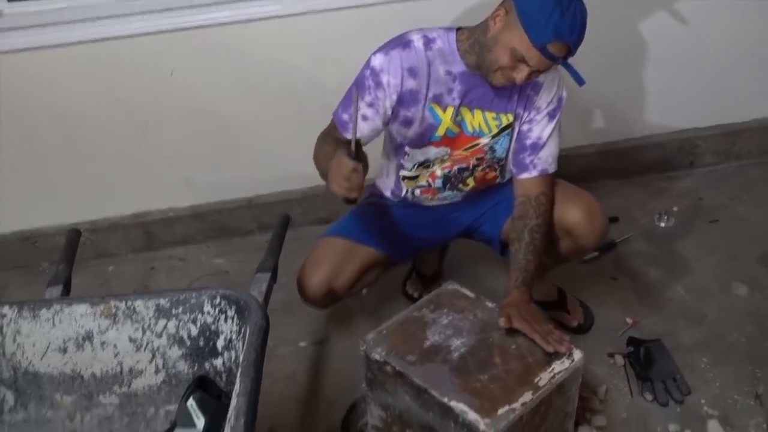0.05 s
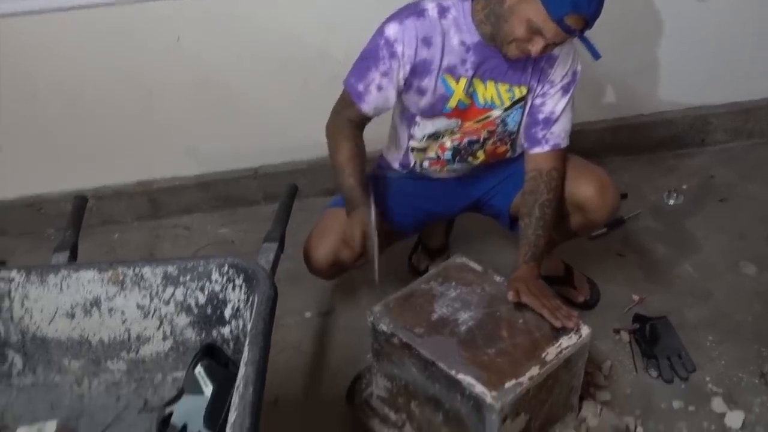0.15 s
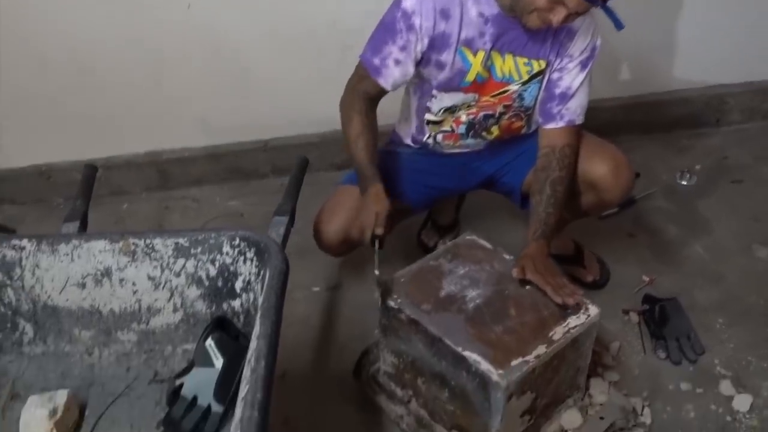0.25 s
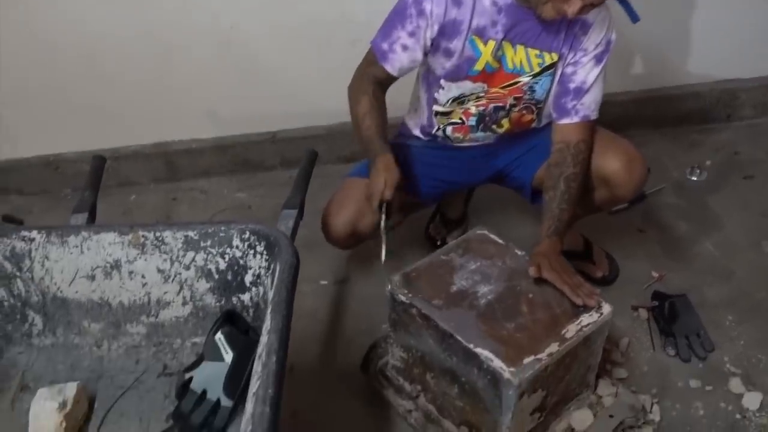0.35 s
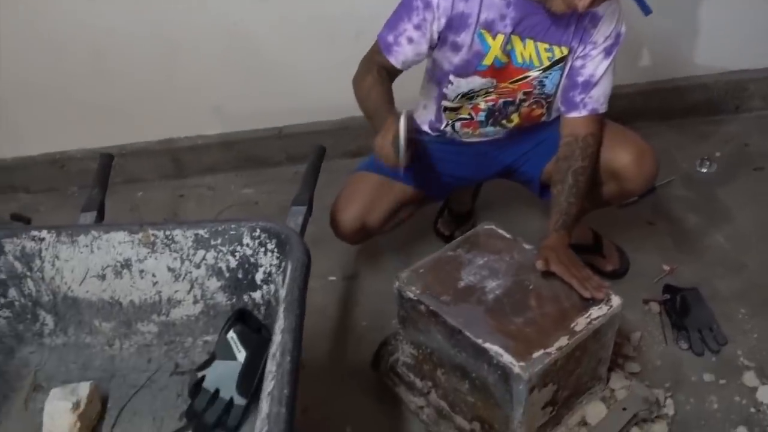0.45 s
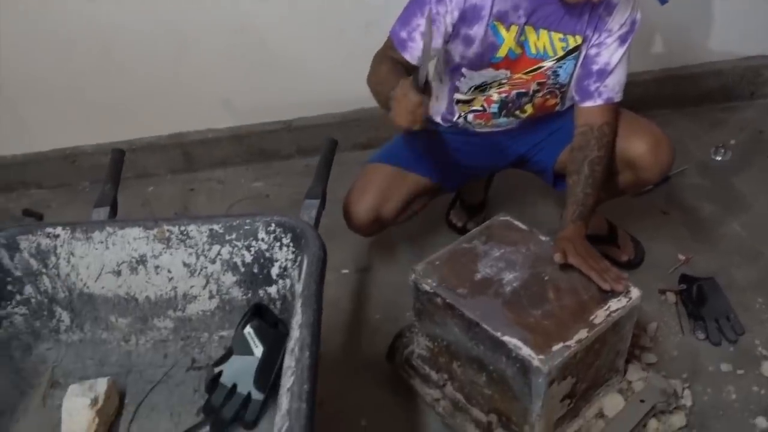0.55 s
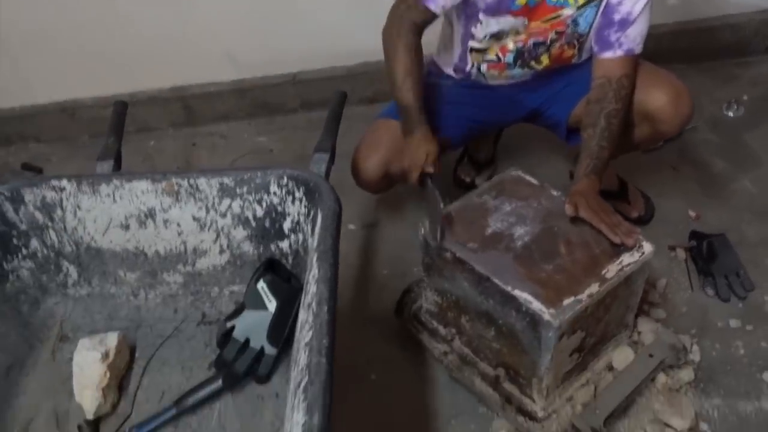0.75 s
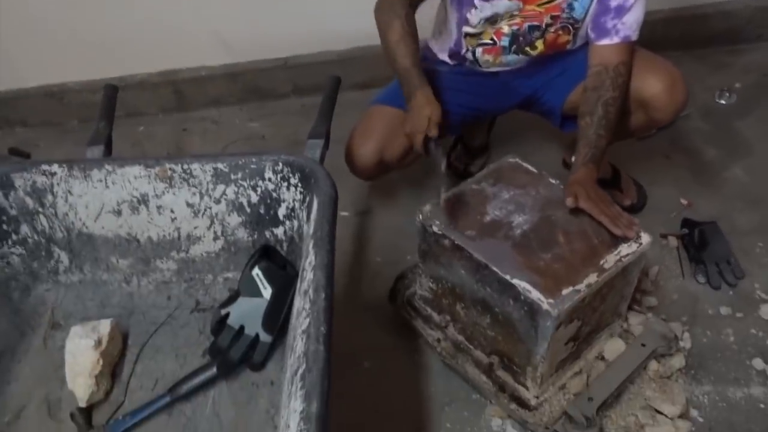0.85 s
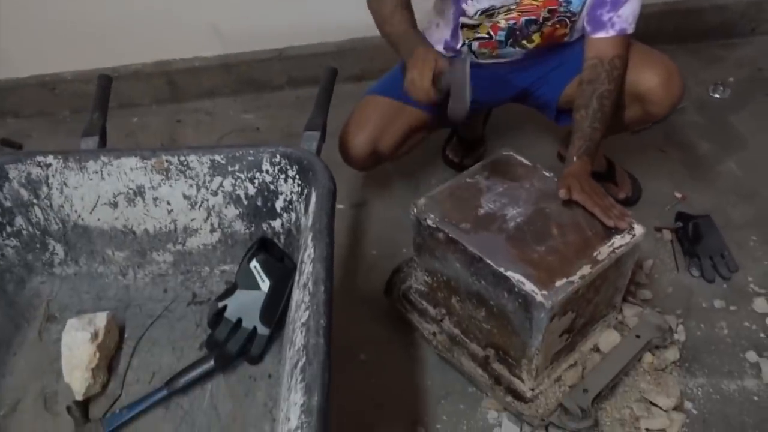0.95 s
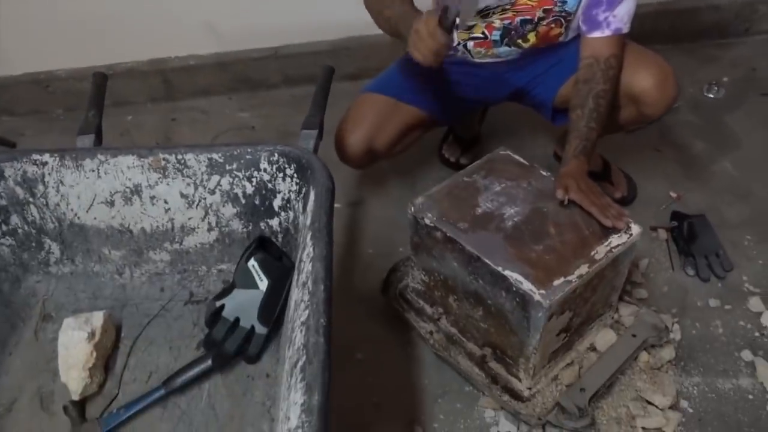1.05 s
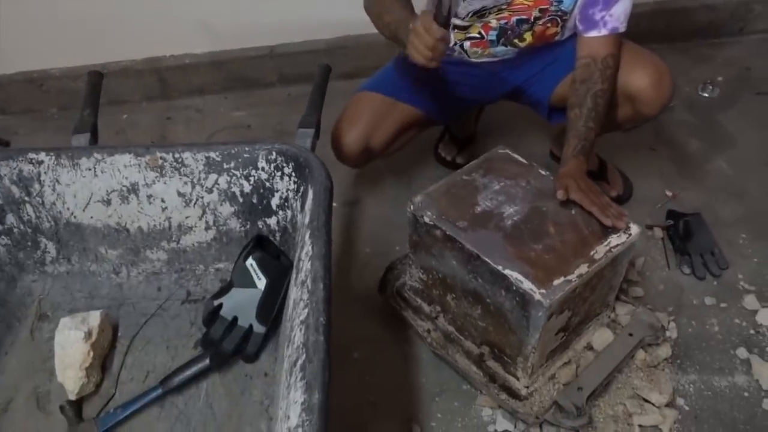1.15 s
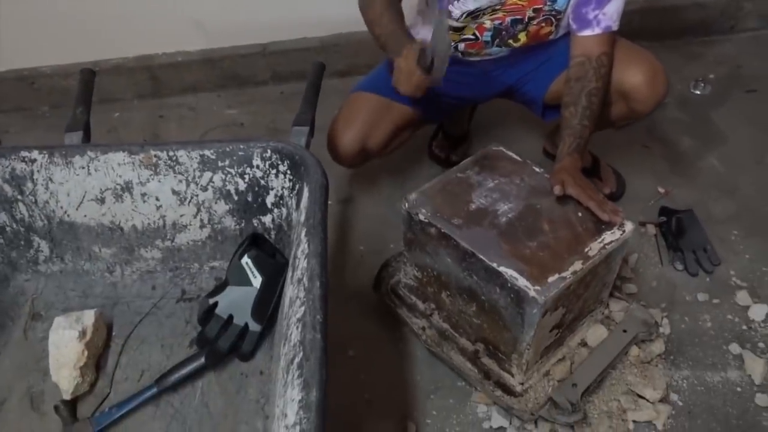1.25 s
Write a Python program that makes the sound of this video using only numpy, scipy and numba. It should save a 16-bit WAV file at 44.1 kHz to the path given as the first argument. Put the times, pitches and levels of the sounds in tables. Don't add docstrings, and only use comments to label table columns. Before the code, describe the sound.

Hammer striking a chisel on a steel safe, two hard cracks ringing in a bare garage

```python
import sys
import numpy as np
from scipy import signal
from scipy.fft import rfft, irfft
from scipy.io import wavfile
from numba import njit

SR = 44100
rng = np.random.default_rng(int(sys.argv[2]) if len(sys.argv) > 2 else 0)


def waveform_to_disk(signal):
    frames = np.transpose(np.atleast_2d(signal))
    scaled = np.clip(frames, -1, 1) * 32767
    samples = np.round(scaled).astype(np.int16)
    wavfile.write(sys.argv[1], SR, samples)


def makeup_ratio(level_db):
    decades = np.asarray(level_db, float) / 20
    return 10 ** decades


N = 57330

STRIKE_TIMES = .2243, .7500
# (level [dB], brightness [dB/octave])
STRIKE_FORCE = [
    (-1.3, -0.17),
    (-1.52, 0.59),
]
# (time [s], level [dB], brightness [dB/octave])
OTHER_BLOWS = [
    (-.30, 1.5, -0.5),
    (0.256, -30.5, 6.5),
    (0.31, -18, -1),
    (0.848, -18.5, 0),
]
# (frequency [Hz], level [dB], t60 [s])
PLATE_MODES = [(83.7, -6, 0.25), (173, -3.5, 0.048), (225.7, 4.5, 0.05), (429.6, 0.5, 0.13),
               (550, -2.5, 0.14), (890, -53, 0.1), (1174, -12, .06), (1320, -15, 0.037), (1890, -16, .05),
               (3290, -14, 0.056), (4140, 0, 0.03)]
# (level [dB], frequency [Hz], t60 [s])
STRAIGHT_MODES = [
    [(-6.5, 184, 0.34), (-19.5, 238, 0.11), (-12.5, 410, 0.44), (-13, 1460, 0.013), (-22, 2900, 0.0094)],
    [(-11.5, 222, 0.36), (-10.5, 178, 0.2), (-9, 2800, 0.025), (-21, 4900, 0.03), (-20.5, 7050, 0.0066)],
]
# (frequency [Hz], level [dB per Hz])
BLOW_COLOUR = [(20, -60), (60, -23), (180, -10), (320, -11.5), (1200, -12.5), (2500, -18.5), (5000, -27),
               (11500, -40)]
# (frequency [Hz], t60 [s])
ROOM_DECAY = [(40, 0.8), (150, .62), (300, 0.73), (1000, 0.62), (2500, .62), (5000, 0.57), (11000, 0.49)]
# (frequency [Hz], level [dB])
STEREO_WIDTH = [(30, -3), (60, -13), (130, -19), (280, -12), (600, -8), (1500, -6.5), (3500, -4), (7000, 1)]
# (time [s], level [dB], frequency [Hz], t60 [s])
GRIT_TICKS = [
    (1.187, -40, 229, 0.067),
    (1.273, -61, 3100, 0.12),
    (1.278, -51, 1280, .04),
    (1.28, -58, 2070, .03),
]
# (frequency [Hz], level [dB per Hz])
HUM_COLOUR = [(18, -27), (30, -8), (201, -3), (930, -30), (1130, -16), (2900, -53), (11000, -69),
              (14300, -92), (22000, -120)]
# (lower band edge [Hz], threshold [dB], loss per dB under it [dB])
HUSH_BANDS = [(2500, -79, 0.21), (4900, -56, 0.19), (7450, -50, 0.56)]

RING_DB, RING_SCATTER_DB = -25.5, 1.5
RISE_S, LONGEST_RING_S = 0.001, 0.4
BLOW_DB = 17.5
DIRECT_DB, DIRECT_S = -16, 0.0029
TAIL_DB, BUILD_S, SIDE_BUILD_S = -3.5, 0.012, 0.021
HUM_DB, LEFT_DB = -63, -0.73
LOW_CUT_HZ, TOP_HZ = 55, 10980
CEILING_DB, RATIO, ROUND = -10, 9.0, 0.39
ATTACK_S, RELEASE_S, AHEAD_S = 0.00032, 0.011, 0.00191
HUSH_S = 0.019


def struck_steel(scatter):
    t = np.arange(SR // 4) / SR
    modes = 0
    for (hz, db, t60), s in zip(PLATE_MODES, scatter):
        per_energy = np.sqrt(t60 * SR / 20)
        modes = modes + makeup_ratio(db + RING_SCATTER_DB * s) * ring(t, hz, t60, np.cos) / per_energy
    click = t == 0
    return click + makeup_ratio(RING_DB) * modes


def straight_from_safe(t):
    heard = 0
    for s, modes in zip(STRIKE_TIMES, STRAIGHT_MODES):
        for db, hz, t60 in modes:
            swell = np.clip((t - s) / (RISE_S + 0.5 / hz), 0, 1)
            heard = heard + makeup_ratio(db) * ring(t - s, hz, min(t60, LONGEST_RING_S)) * swell
    return heard


def garage(t, tilt_db, centres, noise):
    started, t = t >= 0, np.maximum(t, 0)
    gain = makeup_ratio(at(BLOW_COLOUR, centres) + tilt_db * np.log2(centres / 1000))[:, None]
    tail = gain * makeup_ratio(TAIL_DB - 60 * t / at(ROOM_DECAY, centres)[:, None]) * started
    direct = gain * makeup_ratio(DIRECT_DB) * np.exp(-t / DIRECT_S) * np.minimum(t / RISE_S, 1)
    mid = noise[0] * (tail * (1 - np.exp(-t / BUILD_S)) + direct)
    width = makeup_ratio(at(STEREO_WIDTH, centres))[:, None]
    side = noise[1] * tail * width * (1 - np.exp(-t / SIDE_BUILD_S))
    return np.array([mid.sum(axis=0), side.sum(axis=0)])


def blows_in_garage(t, centres, noise):
    blows = [(s, *force) for s, force in zip(STRIKE_TIMES, STRIKE_FORCE)] + list(OTHER_BLOWS)
    scatter = rng.standard_normal((len(blows), len(PLATE_MODES)))
    out = np.zeros((2, N))
    for (s, db, tilt_db), row in zip(blows, scatter):
        lead = SR // 4 if s < 0 else 0
        room = garage(np.arange(-lead, N - lead) / SR - s, tilt_db, centres, noise)
        heard = signal.fftconvolve(room, struck_steel(row)[None])[:, lead:N + lead]
        out += makeup_ratio(db + BLOW_DB) * np.pad(heard, ((0, 0), (0, N - heard.shape[1])))
    return out


def settling_grit(t):
    return sum(makeup_ratio(db) * ring(t - s, hz, t60) for s, db, hz, t60 in GRIT_TICKS)


def background_hum(centres, noise):
    hum = noise[:, :, ::-1] * makeup_ratio(at(HUM_COLOUR, centres))[:, None]
    hum[1] *= makeup_ratio(at(STEREO_WIDTH, centres))[:, None]
    hum = hum.sum(axis=1)
    return makeup_ratio(HUM_DB) * hum / np.std(hum[0])


def ring(t, hz, t60, wave=np.sin):
    return (t >= 0) * wave(2 * np.pi * hz * t) * makeup_ratio(-60 * np.maximum(t, 0) / t60)


def at(table, hz):
    table = np.array(table)
    return np.interp(np.log(hz), np.log(table[:, 0]), table[:, 1])


def noise_bands():
    hz = np.maximum(np.arange(N // 2 + 1) * SR / N, 1)
    centres = 25 * np.sqrt(2) ** np.arange(19)
    octaves = np.log2(hz / centres[:, None])
    shape = np.cos(np.pi / 2 * np.clip(2 * octaves, -1, 1))
    white = rng.standard_normal((2, 1, N))
    return centres, irfft(rfft(white) * shape, N)


def scene():
    t = np.arange(N) / SR
    centres, noise = noise_bands()
    mid, side = blows_in_garage(t, centres, noise) + background_hum(centres, noise)
    mid = mid + straight_from_safe(t) + settling_grit(t)
    return np.array([(mid + side) * makeup_ratio(LEFT_DB / 2), (mid - side) * makeup_ratio(-LEFT_DB / 2)])


@njit
def follow(x, attack, release):
    e, out = x[0], np.empty(len(x))
    for i in range(len(x)):
        e += (x[i] - e) * (attack if x[i] > e else release)
        out[i] = e
    return out


def limiter(x):
    ahead = int(AHEAD_S * SR)
    size = np.abs(x).max(axis=0)
    coming = np.r_[size[ahead:], np.zeros(ahead)]
    level = follow(coming, 1 / (ATTACK_S * SR), 1 / (RELEASE_S * SR))
    return x * np.minimum(makeup_ratio(CEILING_DB) / (level + 1e-9), 1) ** (1 - 1 / RATIO)


def noise_suppressor(x):
    hz, out = np.arange(N // 2 + 1) * SR / N, x
    edges = [row[0] for row in HUSH_BANDS] + [SR]
    for (low_hz, db, slope), high_hz in zip(HUSH_BANDS, edges[1:]):
        above_low = 1 / (1 + (low_hz / (hz + 1)) ** 8)
        above_high = 1 / (1 + (high_hz / (hz + 1)) ** 8)
        band = irfft(rfft(x) * (above_low - above_high), N)
        power = np.mean(band ** 2, axis=0)
        level = np.sqrt(follow(power, 20 / (HUSH_S * SR), 1 / (HUSH_S * SR)))
        out = out - band * (1 - np.minimum(level / makeup_ratio(db), 1) ** slope)
    return out


def band_limit(x):
    return signal.sosfilt(signal.butter(12, 11510, fs=SR, output="sos"), x)


def record(dry):
    x = signal.sosfilt(signal.butter(2, LOW_CUT_HZ, "high", fs=SR, output="sos"), dry)
    x = limiter(x)
    x = np.tanh(ROUND * x) / ROUND
    x = noise_suppressor(x)
    x = signal.sosfilt(signal.ellip(14, 0.3, 80, TOP_HZ, fs=SR, output="sos"), x)
    return band_limit(x)


dry = scene()
out = record(dry)
waveform_to_disk(out)
```